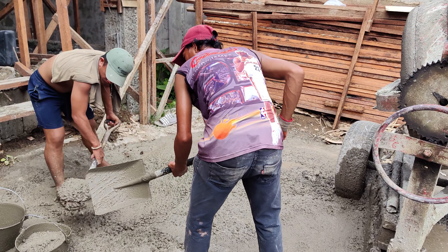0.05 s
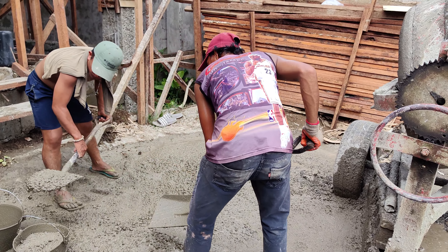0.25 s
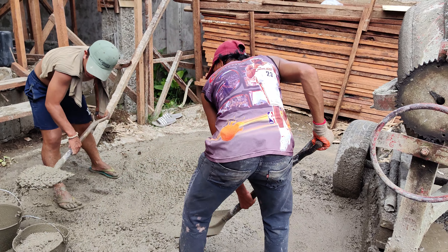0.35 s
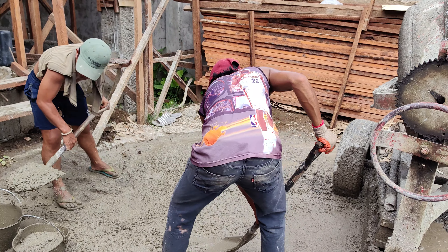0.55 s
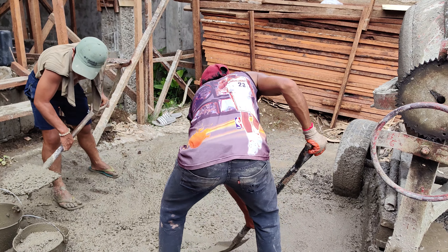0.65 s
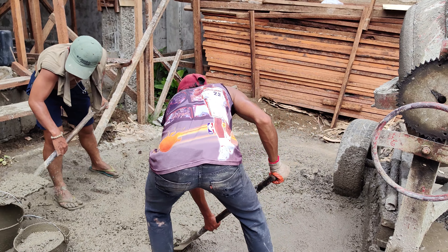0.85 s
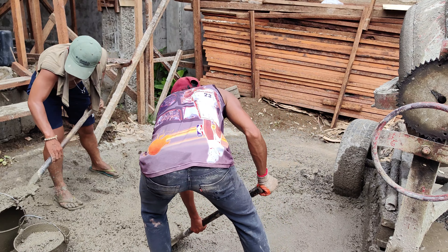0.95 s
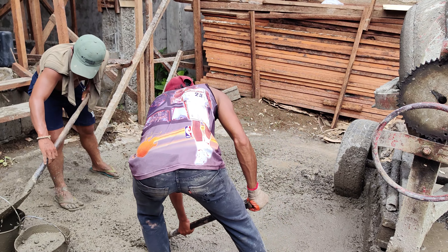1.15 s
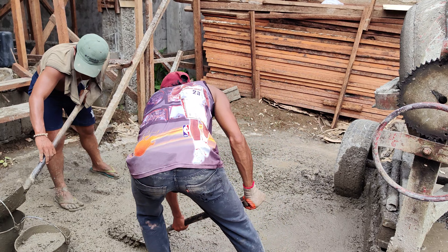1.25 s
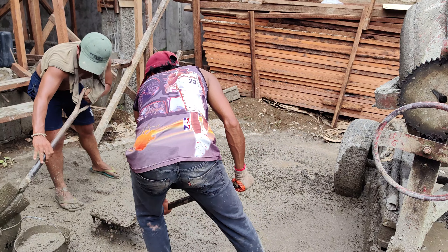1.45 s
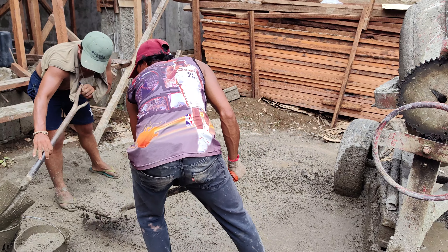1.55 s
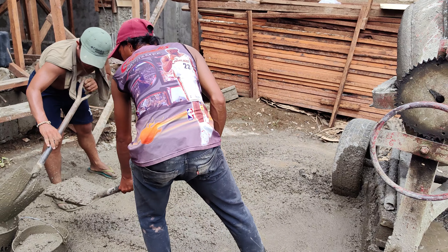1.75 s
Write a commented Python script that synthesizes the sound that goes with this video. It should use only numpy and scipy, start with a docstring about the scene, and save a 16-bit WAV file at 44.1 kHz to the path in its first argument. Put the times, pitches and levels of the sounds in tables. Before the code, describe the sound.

A shovel works wet concrete close by, over a low rumble and faint hiss. From about 0.2 to 0.7 seconds slurry fizzes off the blade and lands in soft thudding clods. The steel knocks near 0.55 and 0.8 seconds. A gritty, rattling scrape runs from 0.75 seconds, sinking in pitch and fading by 1.5 as the last clods drop. A distant shovel scrapes faintly around 1.6 seconds.

```python
"""Wet concrete is mixed by hand on a building site, over a bed of low rumble and faint hiss.
Slurry fizzes off a shovel and lands in soft, thudding clods, with small squirts of wet grit.
The steel blade knocks down, then is shoved through the mix: sand grinds, gravel rattles, and a second
knock rings out. The blade groans lower and lower as it fills, and lifts clear as the last clods drop.
At the end a distant shovel scrapes faintly."""
import sys
import numpy as np
from scipy import signal
from scipy.fft import rfft, irfft
from scipy.io import wavfile

SR = 44100
rng = np.random.default_rng(int(sys.argv[2]) if len(sys.argv) > 2 else 0)


def store_wav(level_fs):
    """Save 16-bit WAV to argv[1]."""
    pcm = np.round(np.clip(np.atleast_2d(level_fs), -1, 1) * 32767)
    wavfile.write(sys.argv[1], SR, pcm.T.astype(np.int16))


N = 79380
T = np.arange(N) / SR

# tone of the background bed: f/Hz, level/dB
BED_EQ = [(30, -14), (66, 0), (100, -10), (800, -25), (15200, -33)]
# slurry sliding over the steel: t/s, level/dB
SLURRY_FADER = [(.13, -40.5), (.19, -47.5), (.39, -43), (.46, -51.5), (.55, -51), (.6, -40.5),
                (1.55, -41.5), (1.8, -46)]
# its bright fizz: f/Hz, level/dB
SLURRY_EQ = [(400, -18), (1500, -13.5), (3000, -7), (5800, -2.5), (7700, -9.5), (9000, -8.5)]
# the heavy mix slumps and is shoved along between clods: t/s, level/dB
CHURN_FADER = [(.215, -58), (.24, -35), (.7, -31.5), (.8, -42), (.95, -45), (1.15, -31), (1.38, -56),
               (1.65, -39), (1.78, -57)]
# dull splat of wet lumps: f/Hz, level/dB
SPLAT_EQ = [(65, 6), (180, 4.5), (420, -5), (540, -15.5), (1400, -20), (4000, -36.5)]
# clods slap down or drop back: t/s, level/dB, pitch/Hz
CLOD_CUES = [(0.228, -25.5, 90.5), (0.3, -26.5, 64), (0.398, -22.5, 79), (.472, -31, 419),
             (0.516, -27, 66.7), (0.599, -27, 410), (.602, -29, 607), (0.593, -27, 71), (0.654, -25, 179.3),
             (0.669, -36, 91), (.704, -30, 865), (0.738, -31, 160), (1.117, -30.5, 246),
             (1.386, -37.5, 230), (1.488, -29.5, 201), (1.516, -34.5, 254)]
# wet grit squirts and drags under the blade; last, a faint scrape of a distant shovel:
# t/s, level/dB, length/s, f/Hz
GRIT_CUES = [(0.299, -41, 0.009, 2580), (0.361, -42, 0.032, 4170), (0.413, -39.5, 0.02, 9900),
             (0.509, -44.5, .008, 2280), (0.578, -37.5, 0.15, 1760), (0.665, -31.5, 0.0093, 5170),
             (0.748, -31, 0.021, 5940), (1.083, -19.5, 0.0071, 12400), (1.084, -22, 0.0063, 2680),
             (1.313, -35, 0.012, 2180), (1.326, -52.5, 0.22, 2900), (1.624, -48.5, 0.25, 910)]
# modes of the steel blade: f/Hz, level/dB, t60/s
BLADE_MODES = [(975, -8, .07), (1140, 7, .07), (1590, -9, .06), (1833, -8, .06), (2070, -2, .04),
               (2502, -9, .05), (2853, -9, .05)]
# the blade hits ground or stones: t/s, level/dB, length/s, low edge/Hz, high edge/Hz
KNOCK_CUES = [(0.5587, -21, 0.014, 830, 4300), (0.816, -13, 0.0095, 724, 1500)]
# the push through the mix: t/s, grit level/dB, rattle level/dB
PUSH_FADERS = [(0.738, -31, -32), (0.749, -20.5, -25.5), (0.763, -18, -27.5), (0.784, -25, -31),
               (0.8, -22.5, -38), (0.812, -16, -24.5), (0.845, -21.5, -29), (0.888, -18, -22.5),
               (1.012, -26, -21), (1.062, -27.5, -30.5), (1.149, -30, -30.5), (1.163, -23, -29.5),
               (1.226, -23.5, -24), (1.27, -31.5, -30), (1.32, -34.5, -28.5), (1.41, -40, -37.5),
               (1.557, -41.5, -40.5)]
# tone of grit and rattle with the blade empty and full: f/Hz, level/dB
GRIT_EMPTY_EQ = [(1400, -5.5), (2000, 2), (3200, 1.5), (4200, -5), (6300, 0), (7500, -10), (10000, -12.5),
                 (15200, -8)]
GRIT_FULL_EQ = [(1400, -19.5), (2000, -0.5), (2450, -7), (3000, 3.5), (3800, -5), (6700, -4.5), (7450, -16),
                (8700, -8.5), (10500, -13), (15200, -10)]
RATTLE_EMPTY_EQ = [(550, -9), (730, 0.5), (1200, 1.5), (1650, 2), (2600, -19.5)]
RATTLE_FULL_EQ = [(200, -10), (500, -5.5), (680, -2.5), (1800, -4), (2300, -12.5), (4000, -27.5)]
# the hollow between blade and mix: t/s, f/Hz, level/dB
HOLLOW_GLIDE = [(.745, 1396, -41), (.9, 1128, -29), (.96, 1049, -37), (1.09, 991, -46), (1.19, 935, -30.5),
                (1.33, 870, -48)]
# the blade's lowest resonance under a growing load: t/s, f/Hz, level/dB
BLADE_GLIDE = [(.95, 690, -40), (1.012, 712, -23), (1.05, 715, -38), (1.074, 420, -44), (1.087, 390, -22.5),
               (1.148, 382, -33), (1.2, 385, -28), (1.23, 366, -22.5), (1.258, 380, -34), (1.36, 362, -33),
               (1.412, 398, -28.5), (1.44, 382, -39)]
# early reflections off ground and blade: delay/s (at t = 1 s), gain
BOUNCE_TAPS = [(.0009, -0.15), (.0023, 0.33), (.0041, 0.59)]
# the right side lags as the shovel swings past: t/s, lag/s
SWING_LAG = [(.6, 0.00029), (.88, .00016), (1.15, .00034)]

GRAINS_DECORRELATE_HZ = 1840  # above this, left and right hear mostly unrelated scatter
CLOD_RISE_S, CLOD_THUD_DB, CLOD_SPLAT_DB = 0.016, 2, -7.5  # rise time of a 100 Hz clod
CONTACT_DB, KNOCK_RING_DB, KNOCK_CRUNCH_DB = 33, -.5, -5.5
FILL_START_S, FILL_END_S = 0.93, 1.2
JUDDER_HZ, JUDDER_DB, SCRAPE_RING_DB = 56.7, 1.21, -14
PATH_GROWTH_PER_S, YARD_T60_S, YARD_DB = .16, .4, -12
BED_DB, CUTOFF_HZ = -52, 15500


def from_db(db):
    """Decibels to gain."""
    return 10 ** (np.asarray(db) / 20)


def unit_rms(x):
    """Scale to rms 1."""
    return x / np.sqrt(np.mean(x ** 2) + 1e-20)


def automation(rows):
    """Breakpoints to one curve per column, held at both ends."""
    times, *columns = np.transpose(rows)
    return [np.interp(T, times, column) for column in columns]


def gate(start, end, release_s):
    """Open from start to end, with a quick attack and an exponential release."""
    return np.clip((T - start) / 0.0028, 0, 1) * np.exp(-np.maximum(T - end, 0) / release_s)


def equalise(x, curve):
    """Shape a steady texture with an EQ curve, rolled off below its first point; rms 1."""
    hz, db = np.transpose(curve)
    f = np.arange(N // 2 + 1) * SR / N + 1e-3
    gain = from_db(np.interp(np.log(f), np.log(hz), db)) / np.sqrt(1 + (0.61 * hz[0] / f) ** 4)
    return unit_rms(irfft(rfft(x) * gain, N))


def band(x, low_hz, high_hz):
    """Causal band-pass."""
    sos = signal.butter(2, [low_hz, min(high_hz, .45 * SR)], "band", fs=SR, output="sos")
    return signal.sosfilt(sos, x)


def delayed(x, lag_s):
    """Delay one channel by a moving lag, in whole samples."""
    return np.interp(T - np.round(lag_s * SR) / SR, T, x, left=0)


def drift(rate_hz):
    """Smooth random modulation; rms 1."""
    pole = np.exp(-2 * np.pi * rate_hz / SR)
    return unit_rms(signal.lfilter([1], [1, -2 * pole, pole * pole], rng.standard_normal(2 * N))[N:])


def grains(per_s, spread_db):
    """Random clicks of uneven size, centred in the bass and wide in the treble; rms 1."""
    sizes = from_db(spread_db * np.minimum(rng.exponential(1, (3, N)), 4)) * rng.choice([-1, 1], (3, N))
    clicks = rfft(sizes * (rng.random((3, N)) < per_s / SR))  # shared, left, right
    width = 1j * np.arange(N // 2 + 1) * SR / N / GRAINS_DECORRELATE_HZ
    return unit_rms(irfft((clicks[0] + width * clicks[1:]) / (1 + width), N))


def background_bed():
    """Low rumble and thin hiss, nearly alike on both sides."""
    noise = rng.standard_normal(N) + 0.32 * rng.standard_normal((2, N))
    return from_db(BED_DB) * equalise(noise, BED_EQ)


def slurry():
    """Fine fizz of the mix sliding over steel."""
    return from_db(automation(SLURRY_FADER)[0]) * equalise(grains(per_s=14000, spread_db=8.5), SLURRY_EQ)


def churn():
    """The slumping mix makes a dull, dense patter of small lumps."""
    return from_db(automation(CHURN_FADER)[0]) * equalise(grains(per_s=790, spread_db=2.5), SPLAT_EQ)


def clods():
    """Each soft lump lands with a thud of a few cycles and a dull splat above it."""
    out, wet = 0, equalise(grains(per_s=2500, spread_db=1.5), SPLAT_EQ)
    for start, db, hz in CLOD_CUES:
        age = np.maximum(T - start, 0)
        rise = CLOD_RISE_S * (100 / hz) ** 0.55  # smaller, higher lumps are snappier
        envelope = age / rise * np.exp(1 - age / rise)
        thud = from_db(CLOD_THUD_DB) * np.sin(2 * np.pi * hz * age)
        splat = from_db(CLOD_SPLAT_DB) * unit_rms(band(wet, 1.29 * hz, 3500))
        out += from_db(db) * envelope * (thud + splat)
    return out


def grit_bursts():
    """Wet grit squirts and drags under the blade; last, a distant shovel scrapes faintly."""
    out, grit = 0, grains(per_s=2600, spread_db=1.5)
    for start, db, length, hz in GRIT_CUES:
        envelope = gate(start, start + length, release_s=0.0051)
        out += from_db(db) * envelope * unit_rms(band(grit, hz / 2, hz * 1.39))
    return out


def blade_ring(force):
    """The steel's modes ring in answer to a force, in alternating polarity; rms 1."""
    out = 0
    for k, (hz, db, t60) in enumerate(BLADE_MODES):
        decay, angle = from_db(-60 / (t60 * SR)), 2 * np.pi * hz / SR
        feedback = [1, -2 * decay * np.cos(angle), decay * decay]
        out += (-1) ** k * from_db(db) * signal.lfilter([0, np.sin(angle)], feedback, force + 1e-18)
    return unit_rms(out)


def knocks():
    """A hard contact and a short crunch, dulled by the wet mix, set the blade ringing."""
    out = 0
    for start, db, length, low_hz, high_hz in KNOCK_CUES:
        stones = band(grains(per_s=3100, spread_db=-1.0), low_hz, high_hz)
        crunch = unit_rms(band(stones, low_hz, high_hz)) * gate(start, start + length, release_s=0.0037)
        contact = from_db(CONTACT_DB) * (np.arange(N) == int(start * SR))
        ring = blade_ring(contact + crunch) * np.std(crunch)
        out += from_db(db) * (from_db(KNOCK_CRUNCH_DB) * crunch + from_db(KNOCK_RING_DB) * ring)
    return out


def scrape():
    """Sand and gravel grind under the juddering blade, which rattles and rings; filling shifts the tone."""
    grit_db, rattle_db = automation(PUSH_FADERS)
    fill = np.clip((T - FILL_START_S) / (FILL_END_S - FILL_START_S), 0, 1)
    sand, gravel = grains(per_s=8900, spread_db=2.5), grains(per_s=1200, spread_db=1.5)
    grit = (1 - fill) * equalise(sand, GRIT_EMPTY_EQ) + fill * equalise(sand, GRIT_FULL_EQ)
    rattle = (1 - fill) * equalise(gravel, RATTLE_EMPTY_EQ) + fill * equalise(gravel, RATTLE_FULL_EQ)
    rattle += from_db(SCRAPE_RING_DB) * blade_ring(sand)
    stroke = gate(PUSH_FADERS[0][0], PUSH_FADERS[-1][0], release_s=0.032)
    judder = from_db(JUDDER_DB * drift(JUDDER_HZ))
    return stroke * judder * (from_db(grit_db) * grit + from_db(rattle_db) * rattle)


def groan(glide, width_hz):
    """Friction drives a resonance: a rough tone that sinks as the load grows."""
    hz, db = automation(glide)
    wobble = drift(width_hz) + 1j * drift(width_hz)
    wobble /= (np.abs(wobble) + 0.15) ** .7  # compress the level swings, keep the pitch rough
    tone = np.real(wobble * np.exp(2j * np.pi * np.cumsum(hz) / SR))
    return unit_rms(tone) * from_db(db) * gate(glide[0][0], glide[-1][0], release_s=0.065)


def close_bounces(x):
    """Reflection paths lengthen as the shovel moves, sweeping a slow comb through the sound."""
    stretch = np.exp(PATH_GROWTH_PER_S * (T - 1))
    echoes = 0
    for delay_s, gain in BOUNCE_TAPS:
        echoes += gain * np.array([delayed(side, delay_s * stretch) for side in x])
    return (x + echoes) / np.sqrt(1 + sum(gain ** 2 for _, gain in BOUNCE_TAPS))


def yard(x, left_db):
    """Sound reaches the right side a little late; timber and walls add a short, faint tail."""
    scatter = rng.standard_normal((2, N)) * gate(0.0035, .005, release_s=YARD_T60_S / np.log(1000))
    scatter /= np.sqrt(np.sum(scatter ** 2, axis=1, keepdims=True))
    tail = signal.fftconvolve(scatter, band(x, 367, 9100), axes=1)[:, :N]
    direct = np.array([x[0], delayed(x[1], automation(SWING_LAG)[0])])
    pan = from_db([[left_db / 2], [-left_db / 2]])
    return pan * direct + from_db(YARD_DB) * tail


def scene():
    """Shovelling near the centre, wet lumps a little to the left, the bed under both."""
    friction = close_bounces(scrape() + grit_bursts() + slurry())
    groans = groan(BLADE_GLIDE, width_hz=24) + groan(HOLLOW_GLIDE, width_hz=40)
    shovelling = yard(friction + groans + knocks(), left_db=0.15)
    lumps = yard(clods() + churn(), left_db=1.9)
    return shovelling + lumps + background_bed()


def record(dry):
    """A steep high cut on the whole mix."""
    return signal.sosfilt(signal.ellip(12, .1, 90, CUTOFF_HZ, fs=SR, output="sos"), dry)


dry = scene()
out = record(dry)
store_wav(out)
```